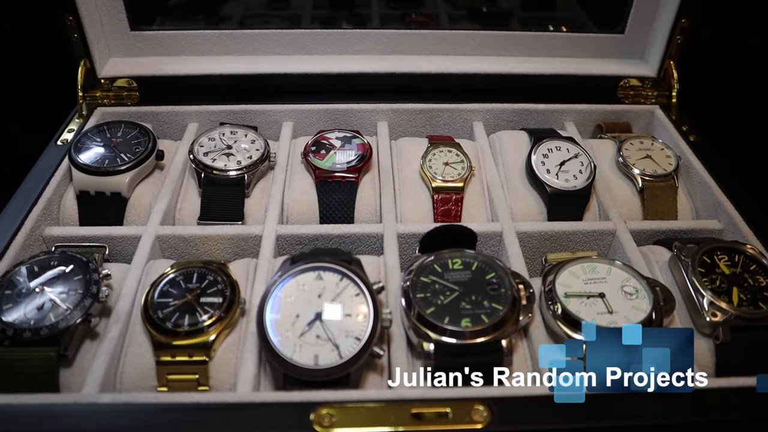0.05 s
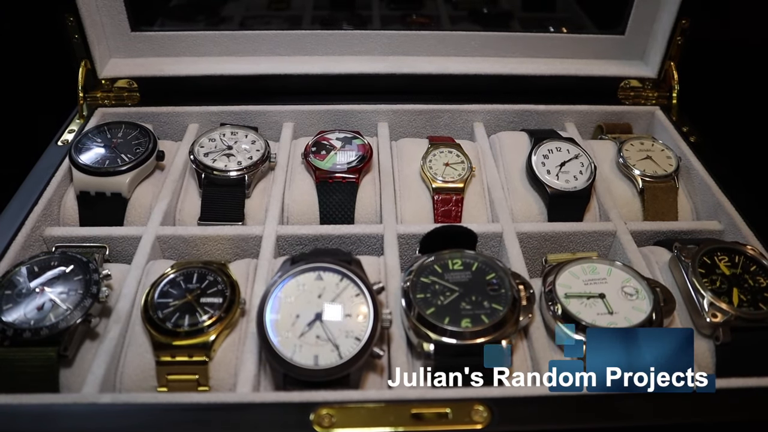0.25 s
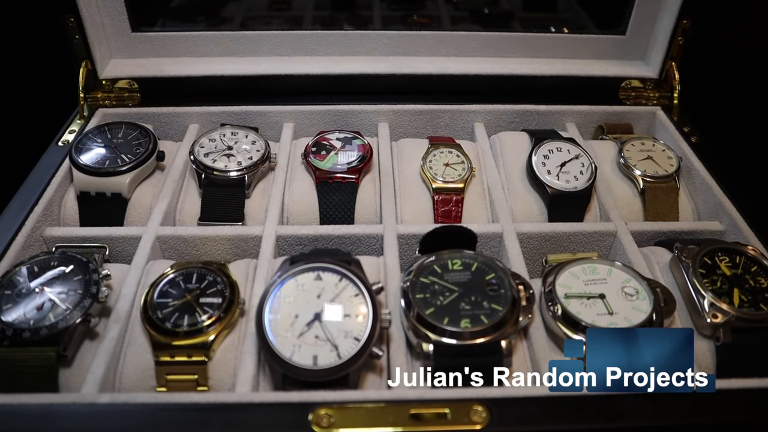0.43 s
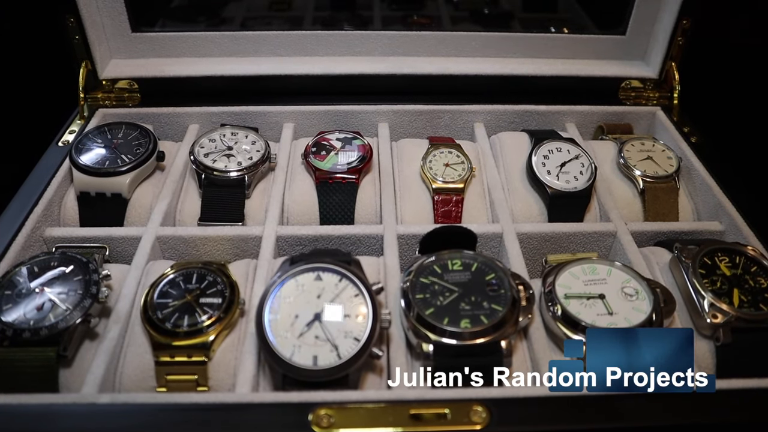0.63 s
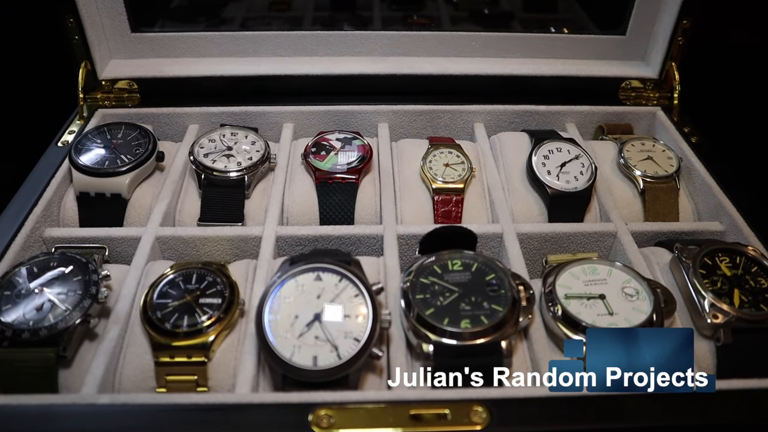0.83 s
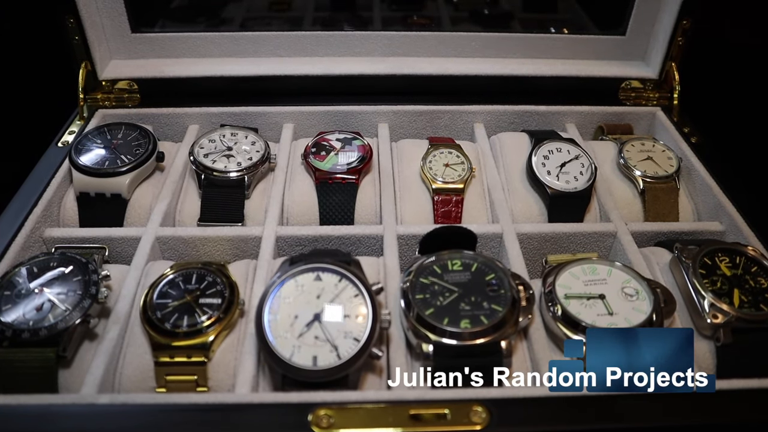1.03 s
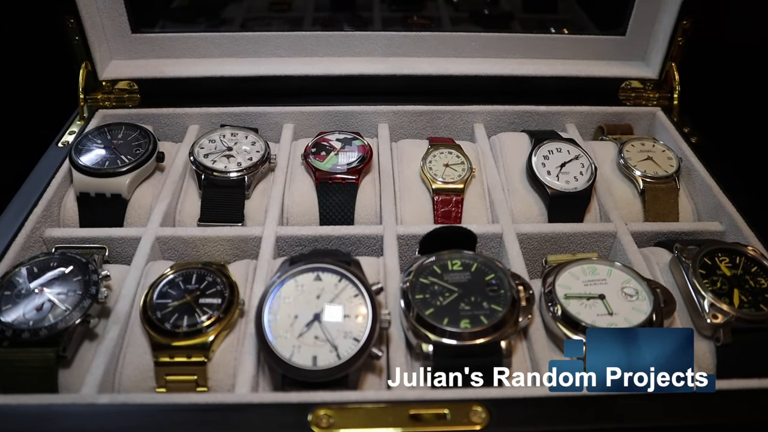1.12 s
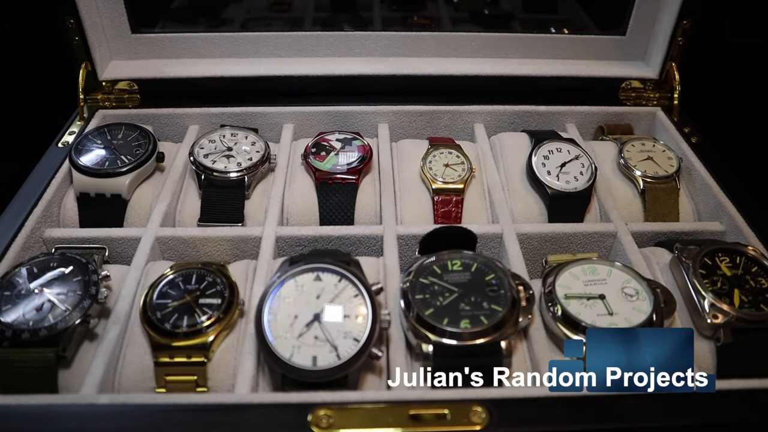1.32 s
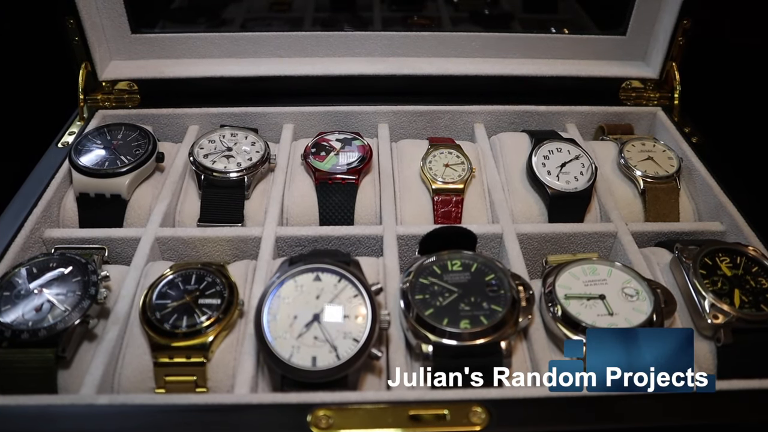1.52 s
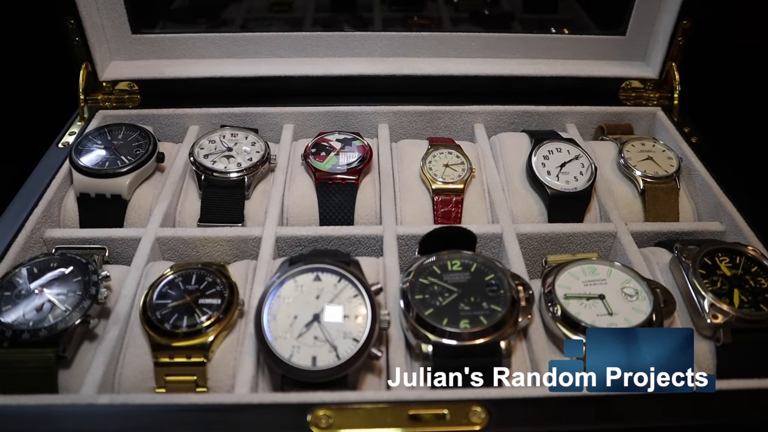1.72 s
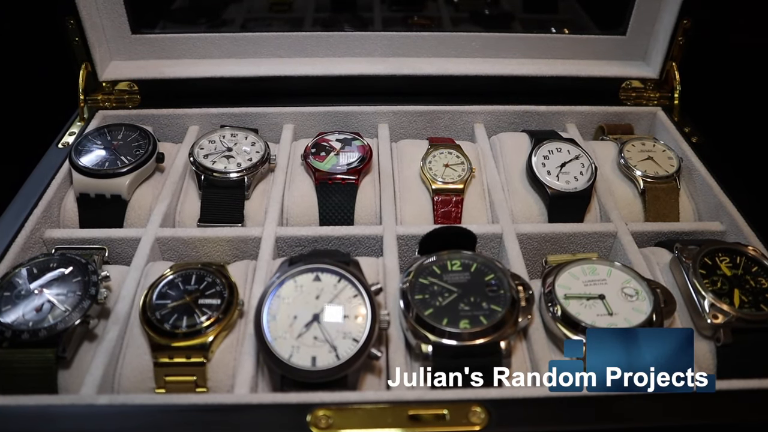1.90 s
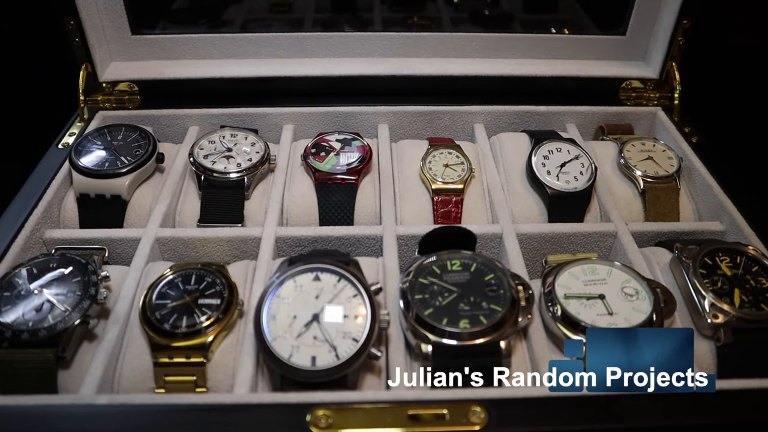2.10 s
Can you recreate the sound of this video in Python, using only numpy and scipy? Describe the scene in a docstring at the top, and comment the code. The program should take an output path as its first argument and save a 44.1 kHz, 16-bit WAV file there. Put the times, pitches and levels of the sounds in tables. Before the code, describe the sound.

Several wristwatches tick faintly in an open display case, each once a second at its own moment, forming uneven clusters that repeat. One tick stands out and rings slightly. Heard close up in a small quiet room with hiss and low hum.

```python
"""Close on an open display case of quartz wristwatches, in a small quiet room.
Microphone hiss, a low hum and a soft drone are there from the start. Faint watches tick first, then
nine nearer ones come in one by one, each once a second at its own moment, the loudest half a second in.
A tick is a quick rattle of contacts, as the motor steps and the gears take up their play, coloured by
that watch's housing. Short echoes of case and room follow it, and the loudest watch rings on."""
import sys
import numpy as np
from scipy import signal
from scipy.fft import rfft, irfft, next_fast_len
from scipy.io import wavfile
from scipy.ndimage import uniform_filter1d, map_coordinates

SR = 44100
rng = np.random.default_rng(int(sys.argv[2]) if len(sys.argv) > 2 else 0)


def persist_wave(psi):
    """Save psi, clipped to +-1, as 16-bit WAV."""
    counts = np.round(np.clip(psi, -1, 1) * 32767).astype(np.int16)
    wavfile.write(sys.argv[1], SR, np.atleast_2d(counts).T)


N = 94815


def amp(db):
    """Decibels to gain."""
    return 10 ** (np.asarray(db) / 20)


def unit(x):
    """x at rms 1."""
    return x / np.sqrt(np.mean(x ** 2) + 1e-20)


def along(points, hz):
    """A curve through (Hz, value) points, read on a log frequency axis."""
    point_hz, values = np.transpose(points)
    return np.interp(np.log(hz + 1), np.log(point_hz + 1), values)


def filtered(x, response):
    """x through a filter whose gain is response(hz)."""
    size = next_fast_len(N + SR // 2)
    return irfft(rfft(x, size) * response(np.fft.rfftfreq(size, 1 / SR)), size)[..., :N]


# The colour of the hiss and room air. Each row: frequency in Hz, relative level in dB.
HISS_SPECTRUM = [(15, -65), (25, -28), (59, -24), (78, -9.5), (120, -5.5), (195, -4.5), (300, -5),
                 (503, -8), (575, -7), (714, -12), (775, -6.5), (840, -9.5), (911, -9.5), (1480, -13.5),
                 (2110, -15), (5430, -18.5), (6380, -19.5), (8140, -21.5), (9070, -22), (10400, -24.5),
                 (14000, -28.5), (16000, -34)]
# The slight drift of its level. Each row: time in seconds, level in dB, taken against the curve's mean.
HISS_DRIFT = [(0.0, -52), (1.48, -53), (1.63, -52.5), (1.86, -52.5), (1.88, -51.5), (2.07, -52),
              (2.15, -50)]
# How alike the microphone's two sides are. Each row: frequency in Hz, correlation from 0 to 1.
HISS_LIKENESS = [(40, 0.21), (100, 0.077), (300, 0.77), (1000, 0.78), (3000, 0.71), (8000, 0.74),
                 (15000, 0.95)]
def hiss(level_db=-54):
    """Microphone hiss and room air: noise that left and right partly share."""
    def mid_side_gains(hz):
        angle = np.arccos(np.clip(along(HISS_LIKENESS, hz), -1, 1)) / 2
        return amp(along(HISS_SPECTRUM, hz)) * [np.cos(angle), np.sin(angle)]

    mid, side = filtered(rng.standard_normal((2, N)), mid_side_gains)
    drift_db = np.interp(np.arange(N) / SR, *np.transpose(HISS_DRIFT))
    return amp(level_db + drift_db - drift_db.mean()) * unit(np.array([mid + side, mid - side]))


def wavering_tone(hz, unsteady, wavers_per_s=14):
    """A tone of rms 1 whose level and phase wander smoothly at random."""
    t = np.arange(N) / SR
    knots = rng.standard_normal((2, int(N * wavers_per_s / SR) + 4))
    real, imaginary = (map_coordinates(row, [t * wavers_per_s]) for row in knots)
    waver = 1 - unsteady + unsteady * (real + 1j * imaginary)
    return unit(np.real(waver * np.exp(2j * np.pi * hz * t)))


# Tones in the room, behind the watches. Each row: frequency in Hz, level in dB, unsteadiness from 0 to 1.
ROOM_TONES = [(304.3, -76, 0.43), (457.5, -73, 1), (602, -77.5, 0.5), (778, -69.5, 0.34), (800, -75.5, 0.4)]
def hum(mains_hz=119.4, mains_db=-65):
    """Steady mains hum under a few wavering tones."""
    mains = amp(mains_db) * unit(np.sin(2 * np.pi * mains_hz * np.arange(N) / SR))
    return mains + sum(amp(db) * wavering_tone(hz, unsteady) for hz, db, unsteady in ROOM_TONES)


# The drone's rise and fall at the microphone. Each row: time in seconds, level of its tone in dB.
DRONE_SWELL = [(0, -61.5), (.06, -59), (.11, -66), (.22, -69), (.4, -68.5), (.67, -62.5), (.76, -75),
               (1.45, -69), (1.54, -63), (1.7, -61), (1.76, -71), (1.86, -63), (1.92, -61), (2.15, -69.5)]
# The rumble around that tone. Each row: frequency in Hz, relative level in dB.
RUMBLE_SPECTRUM = [(110, -40), (155, -4.5), (195, 4.5), (250, -4), (330, -36), (600, -80)]
def drone(tone_hz=198.6, rumble_db=1):
    """A soft low tone and a band of rumble swell and fade together."""
    rumble = unit(filtered(rng.standard_normal(N), lambda hz: amp(along(RUMBLE_SPECTRUM, hz))))
    swell = amp(np.interp(np.arange(N) / SR, *np.transpose(DRONE_SWELL)))
    return swell * (wavering_tone(tone_hz, unsteady=0.53) + amp(rumble_db) * rumble)


def minimum_phase(gain):
    """The response with this gain that rings only after it is struck."""
    cepstrum = irfft(np.log(np.maximum(gain, 1e-6)))
    half = len(cepstrum) // 2
    cepstrum[1:half] *= 2
    cepstrum[half + 1:] = 0
    return np.exp(rfft(cepstrum))


def ticks(contacts, housing, attack_ms=0.11, release_ms=0.42, size=2048):
    """Each gear contact is a brief burst of chatter, coloured by the housing's curve in dB."""
    out = np.zeros(N + SR)
    ms, hz = np.arange(size) * 1000 / SR, np.fft.rfftfreq(size, 1 / SR)

    def above(edge_hz, blend_octaves=0.059):
        return (1 + np.tanh(np.log2((hz + 1) / edge_hz) / blend_octaves)) / 2

    body, sparkle = 1 - above(3900), above(11040)
    bright = above(8200) - sparkle
    for start, length_ms, db, body_db, bright_db, sparkle_db in contacts:
        envelope = (1 - np.exp(-ms / attack_ms)) * np.exp(-np.maximum(ms - length_ms, 0) / release_ms)
        chatter = rfft(envelope * rng.standard_normal(size))
        band_power = np.abs(uniform_filter1d(np.abs(chatter) ** 2, size=31))
        chatter /= np.sqrt(band_power + 1e-12)  # equal force in every band
        colour_db = housing(hz) + body_db * body + bright_db * bright + sparkle_db * sparkle
        click = unit(irfft(chatter * minimum_phase(amp(colour_db))))[:size // 2]
        out[round(start * SR):][:len(click)] += amp(db) * click * np.sqrt(length_ms / ms[-1])
    return out[:N]


# The watches that barely reach the microphone. Each row: first tick in seconds, length in ms,
# level in dB, main resonance in Hz, place (centre or right).
FAINT_WATCHES = [(0.076, 8.3, -58.5, 9200, "centre"), (0.1075, 4.1, -50, 8900, "right"),
                 (.276, 4.6, -57, 5600, "right"), (0.411, 6.1, -54.5, 9150, "centre"),
                 (.579, 2, -60, 9000, "centre"), (0.608, 4.1, -60, 8800, "right"),
                 (0.656, 9.2, -56, 6500, "centre"), (0.772, 7.4, -55, 6700, "right"),
                 (.912, 2.9, -57, 7500, "centre"), (0.976, 0.58, -52.5, 14300, "centre")]
# The housing colour they share. Each row: frequency in Hz, relative level in dB.
FAINT_COLOUR = [(3000, -39), (5000, 0.5), (6800, -1), (9000, -1.5), (10500, -1), (12500, -9), (14000, -10),
                (15800, -25)]
def faint_watches(peak_db=11.5, half_width_hz=500):
    """One contact a second from each, through a housing with its own peak; returns centre and right."""
    places = {"centre": 0, "right": 0}
    for first, length_ms, db, peak_hz, place in FAINT_WATCHES:
        def housing(hz):
            return along(FAINT_COLOUR, hz) + peak_db / (1 + ((hz - peak_hz) / half_width_hz) ** 2)

        contacts = [(start, length_ms, db, 0, 0, 0) for start in np.arange(first, N / SR, 1)]
        places[place] += ticks(contacts, housing)
    return places["centre"], places["right"]


def echoes(x, decay):
    """Diffuse reflections: a noise tail that dies away as the (Hz, t60 in seconds) points say."""
    hz, t, noise = signal.stft(rng.standard_normal(SR // 2), SR, nperseg=128)
    fade = amp(-60 * t / along(decay, hz)[:, None])
    _, tail = signal.istft(noise * fade, SR, nperseg=128)
    return signal.fftconvolve(x, tail / np.linalg.norm(tail))[:N]


# The small room around the case. Each row: frequency in Hz, time to fall 60 dB in seconds.
ROOM_DECAY = [(2000, 0.17), (6000, 0.15), (14000, 0.21)]
def in_case(x, case_db=-7.5, case_t60_s=0.038, room_db=-14):
    """The microphone hears the direct sound, short echoes inside the case and the room's tail."""
    return x + amp(case_db) * echoes(x, [(1, case_t60_s)]) + amp(room_db) * echoes(x, ROOM_DECAY)


# Gear contacts of the nine near watches, by name; a tick and a tock are one watch's alternating steps.
# Each row: start in seconds, length in ms, level in dB, then body, brightness and sparkle in dB.
GEAR_CONTACTS = { "thin": [(0.1707, 1.3, -41, -4, -1, 8), (0.1757, 1.3, -42, -6.0, -6, -2),
                 (1.1677, 6, -47, 3, 1, -10), (1.1745, 1.3, -34.5, 6, 8.0, 8),
                 (1.1788, 3.4, -44.5, 1, -11, -17)], "dull tick": [(0.233, 5.5, -42.5, 3, -7, -16),
                 (0.2367, 6.1, -31, -4, 0, 2), (0.2425, 1.8, -46, -7, 0.0, 4)],
                 "dull tock": [(1.2352, 1.8, -33.5, 9, 8, 1), (1.238, 3.2, -31, -3, -3, -1),
                 (1.2442, 2.8, -40, -12, -3, -4.0)], "hollow": [(0.4315, 3.6, -40, -0.5, -4, 1),
                 (0.436, 6.4, -48.5, -6, -6, 5.0), (0.4427, 2.1, -37.5, -2, -6, -2),
                 (1.432, 3.7, -38, 4.5, 14.5, 3), (1.439, 5, -40.5, -16, 3, -3)],
                 "raspy": [(0.4615, 1.5, -36, -6, -2, -13), (0.466, 18, -46.5, 9, -1, -4),
                 (0.4795, 2.0, -45, 2.0, -9, 12), (1.4628, 1.2, -48, -1, -4, 3),
                 (1.4663, 1.9, -35, -5.0, -1, -5), (1.471, 4.0, -54, 8.0, 4.0, 2.0),
                 (1.4758, 2.9, -40, -11.0, -2, -1)], "loud tick": [(0.4966, 0.57, -35, 0, 7, 21),
                 (0.5012, 3.5, -31, 8, -1, 0), (0.5039, 4.3, -23.5, 0.5, -0.5, 0),
                 (0.5049, 1.24, -24, 1.5, 7, 8)], "loud tock": [(1.496, 2.27, -26, 1, 3, 0),
                 (1.4995, 5.5, -41, 0, 2, 3), (1.5046, 3, -37, 10, 7, 3), (1.509, 1.4, -33.5, 2, 6, 6),
                 (1.5158, 1.4, -40, 0, -8, -10)], "dry": [(0.6758, 1.5, -30.5, -2, -2, -6),
                 (0.6798, 2.7, -38, -3, -10, 7), (0.684, 4.7, -41, 1, 1, 1),
                 (1.6755, 1.8, -45.5, 5, 14, -6), (1.684, 3, -40, 11, 9, -5),
                 (1.687, 2.2, -44.5, 11.5, 6, 4)], "sharp tick": [(0.7245, 3.3, -41, -5, -2, -6),
                 (0.731, 2, -26, 0, 1.5, 5.0), (0.7325, 1.6, -26.5, 0, -1, -2),
                 (0.7352, 0.96, -29.5, 2, 0, -3), (0.7398, 2.3, -30.5, -6, -4, 3),
                 (0.742, 7.2, -49, 5, -14, -1.0)], "sharp tock": [(1.726, 2.7, -35.5, -11, -4, -5),
                 (1.729, 4.0, -41.5, 4, 5, 3), (1.734, 12, -45, 4, 1, 3), (1.7447, 12, -47, -2, 1, -3),
                 (1.7575, 3.8, -44, 0, -1, -4)], "tiny": [(0.802, 6, -51.5, 17, -6, -6),
                 (0.8103, 3.1, -50, 2.0, 0, -2), (1.803, 2.2, -42.5, -7.0, 3.0, -2),
                 (1.8062, 1.7, -42.5, 3, 5, 9.0), (1.8086, 1.7, -42.5, 1, -6, -6)],
                 "crisp tick": [(0.8768, 2.6, -39, 8, -9, -12), (0.8785, 1.9, -33, -4, -6.5, -5),
                 (0.8815, 1.1, -40, -7, 10, 2), (0.883, 13, -49.5, 18, 9.5, 3)],
                 "crisp tock": [(1.8725, 6.1, -46, 2, -12, -10), (1.8813, 1.8, -42, 2, 4, 7),
                 (1.8838, 1.6, -37.5, -3, -12, 0), (1.886, 8.5, -45, 2, 13, 2)], }
# Their housings' resonances, under the same names. Each row: frequency in Hz, relative level in dB.
HOUSING_COLOURS = { "thin": [(2060, -53), (3500, -21), (4340, -30), (4560, -16), (5200, -0.5), (5990, -16),
                   (6800, -3), (7470, -11), (9050, -5), (9610, -21), (10400, 0.5), (10800, 7), (11700, -17),
                   (13000, -58)], "dull tick": [(1470, -50), (3600, -16), (4500, -11), (4850, -3),
                   (5100, 5), (5450, 1), (5950, -5), (6700, 0.5), (7600, -4.5), (8700, -13), (9200, -10),
                   (9950, -9), (10500, -21), (12100, -25), (12900, -11), (13700, -30), (15500, -36)],
                   "dull tock": [(1470, -50), (2900, -32), (3400, -14), (4700, -7.5), (5500, -2.5),
                   (5950, 0), (6300, 0.5), (6750, 2.5), (7400, -15), (8450, -4), (9200, -17), (9900, -6),
                   (10350, -16), (11600, -12), (13000, -13), (14000, -32), (15500, -36)],
                   "hollow": [(940, -43), (1600, -18), (1850, -25), (2370, -2), (2540, -10), (2860, -22),
                   (3300, -11), (4670, -38), (5380, -3.5), (6050, -22), (7230, -6.5), (7900, -12),
                   (8560, -9), (9200, -15), (10300, -6), (11800, -10), (13500, -48)], "raspy": [(2650, -40),
                   (4500, -29), (5850, -19), (6770, -5), (7370, -9), (8320, -2), (8930, -13), (9680, -2.5),
                   (12000, -20), (13400, -10), (15000, -47)], "loud tick": [(1180, -50), (2000, -53),
                   (2900, -30), (3270, -13.5), (4400, -9), (4950, -12), (5240, 3), (5500, -6), (5850, -17),
                   (6500, 4), (6900, -7), (7320, -15), (8620, -22), (9600, -7), (10050, -15), (10800, -24),
                   (11800, -16), (13100, -15), (14700, -38), (15800, -50)], "loud tock": [(1500, -63),
                   (3000, -31), (4100, -19), (4600, -3), (4900, -2.5), (5400, -3.5), (5850, -17),
                   (6250, 2.5), (6550, 4), (7150, -15), (7700, -18), (8700, -27), (9600, -7), (10150, -22),
                   (10650, -16), (11300, -35), (12100, -19), (13200, -34), (15800, -46)],
                   "dry": [(1530, -56), (2600, -25), (3810, -5), (5020, -13), (5410, 0), (5960, -8.5),
                   (6870, 10), (7570, -9), (8210, -1), (8790, -16), (9610, -2.5), (10300, -29), (11800, 1),
                   (12900, -24), (14000, -8), (15500, -39)], "sharp tick": [(1530, -61), (2600, -22),
                   (3290, -30), (3820, -10.5), (4250, -28), (5490, -18), (6340, -0.5), (6730, 3),
                   (8070, -9), (8320, 3.5), (8700, 8.5), (9530, -3), (10600, -21), (12200, -6.5),
                   (14200, -26), (14800, -36), (15800, -34)], "sharp tock": [(1530, -50), (3300, -17),
                   (3800, -11), (4250, -28), (5600, -24), (6100, -6), (7000, -3), (7500, 5), (8000, -8),
                   (8550, -7), (9150, 1.5), (9900, -4), (10600, -15), (12000, -10), (13500, -13),
                   (15500, -38)], "tiny": [(2940, -38), (5000, -25), (5590, -25), (5920, -13), (7240, -1),
                   (8500, -9), (8690, -35), (9750, 7), (11100, -9), (12600, 3), (13100, -4), (14500, -35)],
                   "crisp tick": [(2350, -50), (4000, -19), (5080, -36), (5560, 3), (5910, 1.5), (7130, -3),
                   (7630, 7.5), (7850, -5), (8360, -19), (9570, 0), (9960, -12), (10800, -22), (11900, -9),
                   (13800, -12), (15500, -37)], "crisp tock": [(2350, -45), (4000, -22), (5700, -18),
                   (6080, 2), (6700, -2), (7400, -21), (7900, -4), (8400, -18), (9200, -17), (9650, 0),
                   (10600, -27), (11700, -10), (12900, -19), (13500, -9), (14100, -22), (15500, -38)], }
def near_watches():
    """Motor steps rattle the gears in each housing; returns centre, right and the loudest watch apart."""
    centre = right = loudest = 0
    for name, contacts in GEAR_CONTACTS.items():
        rattle = ticks(contacts, lambda hz: along(HOUSING_COLOURS[name], hz))
        if name in ("loud tick", "loud tock"):
            loudest += rattle + ringing(contacts)
        elif name in ("thin", "dull tick", "dull tock", "raspy"):
            right += rattle
        else:
            centre += rattle
    return centre, right, loudest


# Modes of the loudest watch, straight ahead of the microphone.
# Each row: frequency in Hz, relative level in dB, time to fall 60 dB in seconds.
HOUSING_MODES = [(4690, 0, 0.19), (4800, 1, 0.16), (5400, -8, .11), (6560, -12, .15), (6900, -13, .12),
                 (9400, -8, .11)]
def ringing(contacts, ring_db=-29):
    """Each contact strikes narrow modes of the housing, which keep sounding after the tick."""
    t, out = np.arange(SR // 3) / SR, np.zeros(N + SR)
    for start, length_ms, level_db, *_ in contacts:
        modes = sum(amp(db - 60 * t / t60) * np.sin(2 * np.pi * (hz * t + rng.random()))
                    for hz, db, t60 in HOUSING_MODES)
        out[round(start * SR):][:len(t)] += amp(ring_db + level_db) * np.sqrt(length_ms) * modes
    return out[:N]


def scene(right_db=2.5):
    """From the microphone: watches ahead and hard right, over a background that leans slightly right."""
    near_centre, near_right, loudest = near_watches()
    faint_centre, faint_right = faint_watches()
    centre = in_case(near_centre + faint_centre) + in_case(loudest, case_db=-19)
    right = amp(right_db) * in_case(near_right + faint_right)
    background = (hiss() + hum() + drone()) * amp([[-1], [1]])
    return np.array([centre, centre + right]) + background


def record(dry, top_hz=16000):
    """The recorder keeps nothing above its band limit."""
    return filtered(dry, lambda hz: hz < top_hz)


dry = scene()
out = record(dry)
persist_wave(out)
```